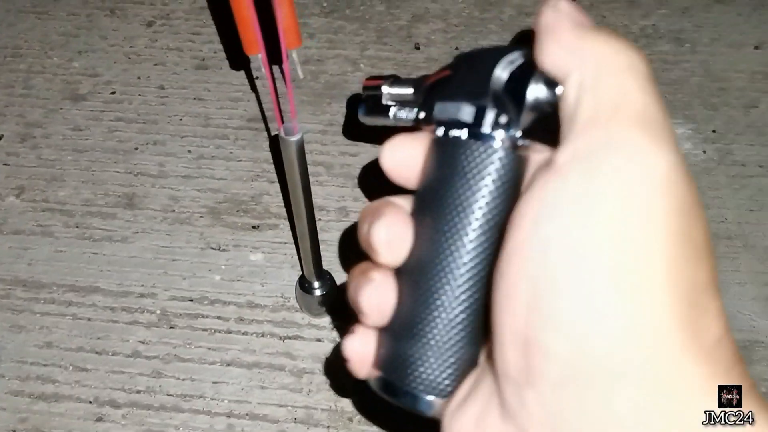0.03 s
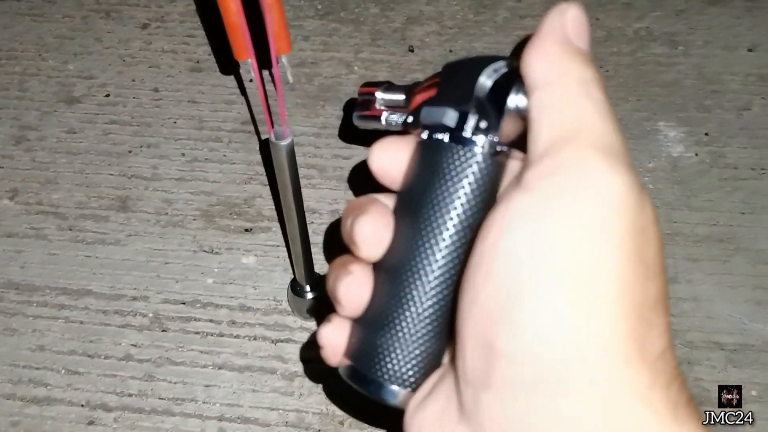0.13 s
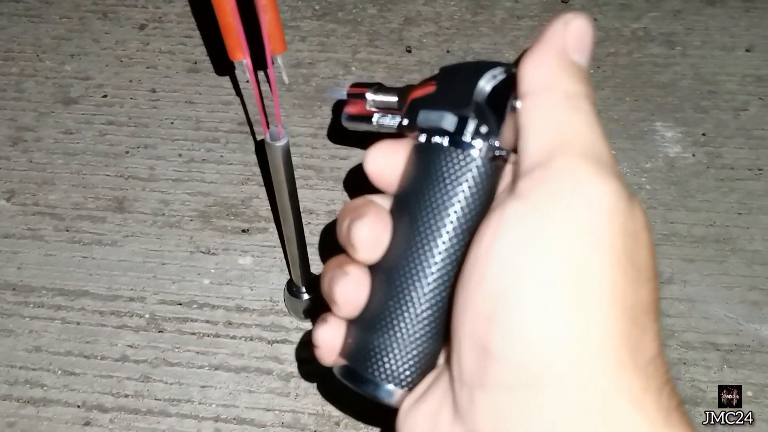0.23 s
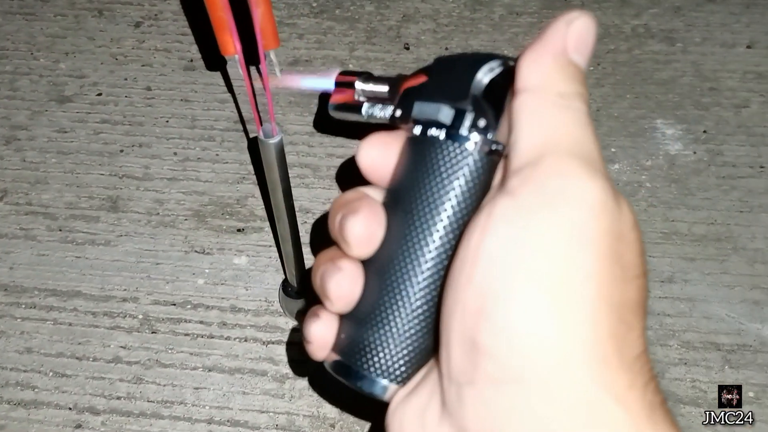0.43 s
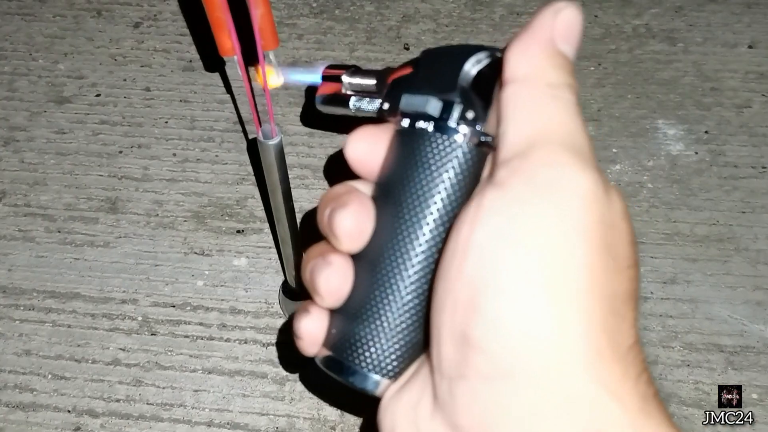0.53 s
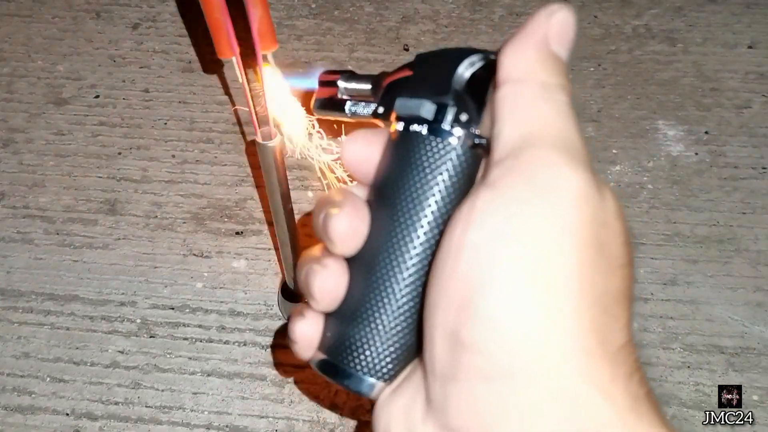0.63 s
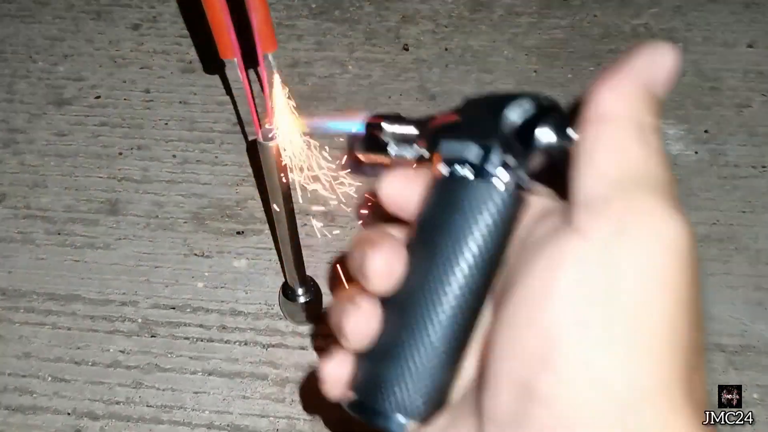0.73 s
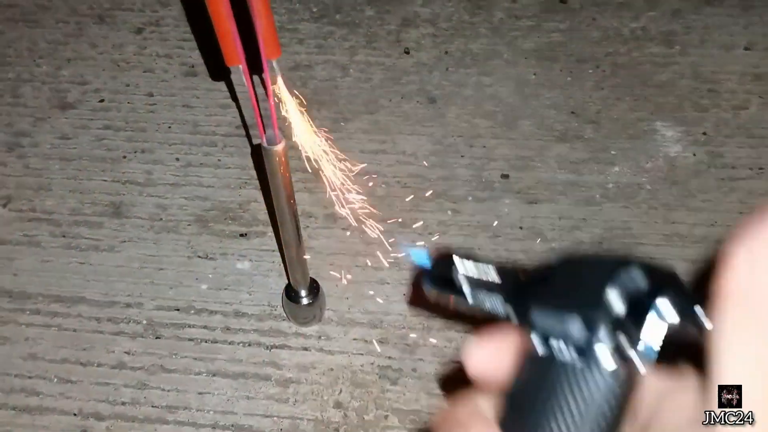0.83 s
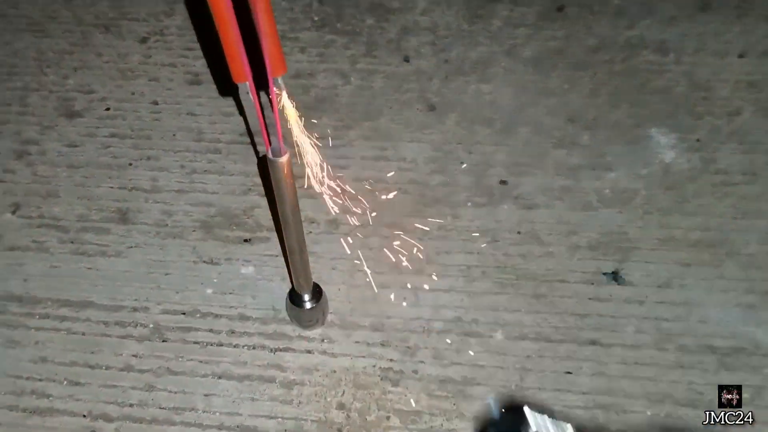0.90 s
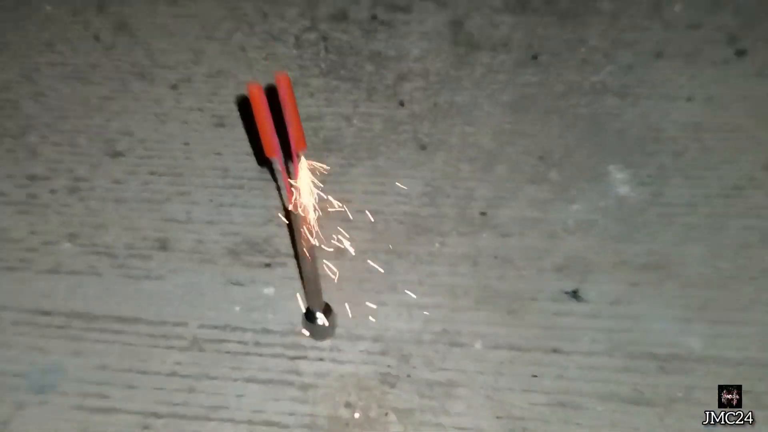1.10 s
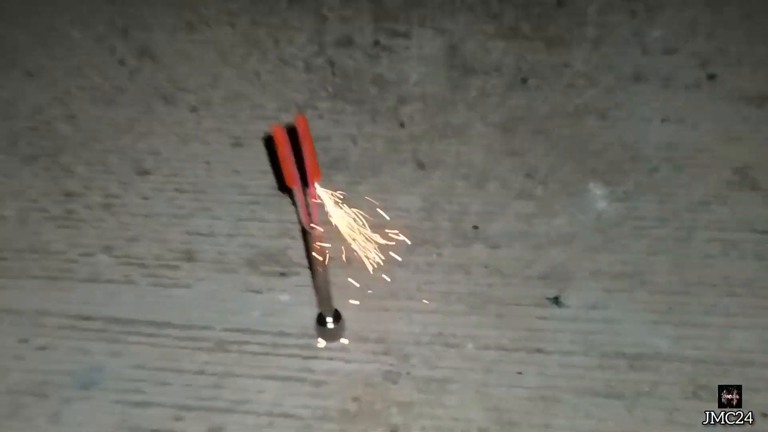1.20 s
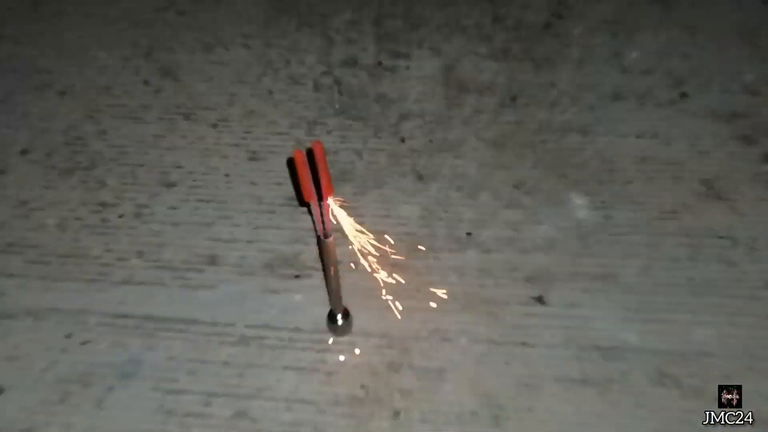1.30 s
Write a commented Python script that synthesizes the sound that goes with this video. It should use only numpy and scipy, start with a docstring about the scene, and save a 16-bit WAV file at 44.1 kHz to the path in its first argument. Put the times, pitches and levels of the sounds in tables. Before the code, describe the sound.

Close up, a torch lighter clicks alight after a brief gas hiss. Its rushing flame fades as the fuses of small rockets on concrete spit and fizz unevenly, over a low rumble of air and handling.

```python
"""Gas hisses from a torch lighter over a low rumble, close to a hand-held pair of microphones.
The piezo striker snaps, the nozzle rings and the jet flame catches. It lights the fuses of small
rockets on a concrete floor: the powder spits twice and fizzes in surges as the lighter is drawn away.
The left microphone hears mostly the upper middle, the right one the top; the floor throws the fizz back."""
import sys
import numpy as np
from scipy import signal
from scipy.fft import rfft, irfft
from scipy.io import wavfile
from scipy.ndimage import map_coordinates

SR = 44100
rng = np.random.default_rng(int(sys.argv[2]) if len(sys.argv) > 2 else 0)


def pcm_store(signal):
    """Save signal as 16-bit PCM."""
    levels = np.round(np.clip(np.atleast_2d(signal), -1, 1) * 32767)
    wavfile.write(sys.argv[1], SR, levels.astype(np.int16).T)


N = 59535
TIME, BIN_HZ = np.arange(N) / SR, np.fft.rfftfreq(N, 1 / SR)
SNAP_S, CATCH_S, WITHDRAW_S = 0.2032, 0.0098, 0.77  # the strike, time taken to catch, lighter drawn away


def amp(db):
    """Decibels to gain."""
    return 10 ** (np.asarray(db) / 20)


def unit(x):
    """Scales to rms 1."""
    return x / np.sqrt(np.mean(x ** 2) + 1e-20)


def read(table, hz, column=1):
    """One column of a table, interpolated on a log-frequency axis."""
    table = np.array(table)
    return np.interp(np.log(hz + 1), np.log(table[:, 0] + 1), table[:, column])


def add(mix, start_s, sound):
    """Mixes a sound in at the given time."""
    part = mix[..., round(start_s * SR):][..., :sound.shape[-1]]
    part += sound[..., :part.shape[-1]]


def delay(x, seconds):
    """Delays by any time, even a fraction of a sample."""
    return irfft(rfft(x) * np.exp(-2j * np.pi * BIN_HZ * seconds), N)


def lowpass(x, hz, order=2):
    """Causal low-pass."""
    return signal.sosfilt(signal.butter(order, hz, fs=SR, output="sos"), x)


def colour(pair, table, size=4096):
    """Gives each microphone's signal its own minimum-phase colour."""
    hz = abs(np.fft.fftfreq(size, 1 / SR))
    log_gain = np.log(amp([read(table, hz, 1), read(table, hz, 2)]))
    response = np.exp(np.conj(signal.hilbert(log_gain)))
    taps = np.fft.ifft(response).real[:, :size // 2]
    return signal.fftconvolve(pair, taps, axes=1)[:, :N]


# How alike the two microphones hear. Each row: frequency in Hz, likeness from 0 to 1.
MIC_LIKENESS = [(50, 0.89), (600, 0.92), (1300, 0.88), (2500, 0.49), (5000, 0.16), (9000, 0), (15000, 0)]


def at_mics(a, b):
    """Blends two unrelated signals into a pair, alike in the bass and unlike in the treble."""
    same = read(MIC_LIKENESS, BIN_HZ)
    return np.array([a, irfft(same * rfft(a) + np.sqrt(1 - same ** 2) * rfft(b), N)])


def noise():
    """White turbulence at both microphones."""
    return at_mics(*rng.standard_normal((2, N)))


def flutter(depth_db, hz):
    """A random gain that wavers up to the given rate."""
    return amp(depth_db * unit(lowpass(rng.standard_normal(N), hz)))


def scatter(t60, size=3000):
    """A dying burst of noise of energy 1 at each microphone."""
    burst = rng.standard_normal((2, size)) * amp(-60 * TIME[:size] / t60)
    return burst / np.linalg.norm(burst, axis=1, keepdims=True)


# Air and handling, right at the microphones. Each row: frequency in Hz, left and right gain in dB.
RUMBLE_COLOUR = [(20.2, -62, -54), (44.6, -50.5, -34), (91, -36, -28.5), (129.3, -35.5, -29),
                 (245, -52, -44.5), (412, -42.5, -43)]
# Its rise and fall. Each row: time in seconds, gain in dB.
RUMBLE_SWELL = [(0, -3), (.13, -1), (.27, -0.5), (.45, -2), (.6, -2), (.75, 0), (.97, 0), (1.1, -4),
                (1.35, 1.5)]


def rumble():
    """Lumpy low noise of moving air and handling, over faint room hiss and a thin whine."""
    swell = amp(np.interp(TIME, *np.transpose(RUMBLE_SWELL)))
    low = lowpass(colour(noise(), RUMBLE_COLOUR), hz=308, order=3)
    hiss = amp(-72) * noise()
    whine = amp(-82.5) * np.sin(2 * np.pi * 2260 * TIME)
    return low * swell + hiss + whine


# The unlit jet, close up. Each row: frequency in Hz, left and right gain in dB.
GAS_COLOUR = [(696, -84, -64), (1530, -68, -69), (3340, -53, -74), (4000, -49, -69), (4190, -37, -61),
              (5450, -33, -45), (6040, -49.5, -51), (6880, -37.5, -35.5), (8100, -49.5, -50),
              (8460, -65, -63), (9280, -63, -60), (10210, -49, -35), (12500, -61, -57), (14100, -63, -46),
              (15200, -49, -56)]


def gas(open_s=0.015, rise_s=0.03, swell_db_per_s=40):
    """The valve opens and the cold jet swells until it is lit."""
    opening = np.clip((TIME - open_s) / rise_s, 0, 1) ** 2
    unlit = np.clip(1 - (TIME - SNAP_S) / CATCH_S, 0, 1)
    swell = amp(1.3 + swell_db_per_s * np.minimum(TIME - SNAP_S, 0))
    return colour(noise() * opening * unlit * swell * flutter(depth_db=1.06, hz=63), GAS_COLOUR)


# Knocks on the left microphone only. Each row: start in seconds, relative level in dB, pitch in Hz.
LEFT_KNOCKS = [(0.1204, -28.5, 900), (0.2041, -29, 310), (0.7895, -23, 750)]


def knocks(t60=0.0019):
    """The trigger, the lighter's body and the hand give dull, quickly damped knocks."""
    out = np.zeros((2, N))
    for start_s, db, hz in LEFT_KNOCKS:
        decay = amp(db - 60 * TIME / t60)
        add(out[0], start_s, 2 * decay * np.sin(2 * np.pi * hz * TIME))
    return lowpass(out, hz=3060, order=4)


# Close thumps, most of them heavier on the right microphone.
# Each row: start and length in seconds, pitch in Hz, left and right level in dB.
LOW_THUMPS = [(0.2029, 0.0123, 147, -44, -31.5), (0.2062, .024, 44.3, -56, -36.5),
              (0.7112, 0.0077, 94, -54, -41.5), (0.7898, .007, 170, -39.5, -54),
              (1.238, 0.025, 77.6, -53.5, -45.5)]


def thumps():
    """Low pushes: the striker jolts the lighter, the gas catches, the hand moves."""
    out = np.zeros((2, N))
    for start_s, length_s, hz, left_db, right_db in LOW_THUMPS:
        t = np.arange(0, length_s, 1 / SR)
        push = np.sin(np.pi * t / length_s) ** 0.5 * np.sin(2 * np.pi * hz * t)
        add(out, start_s, amp([[left_db], [right_db]]) * push)
    return out


# The striker at close range. Each row: frequency in Hz, left and right gain in dB.
SNAP_COLOUR = [(720, -41, -27), (1320, 3.5, 4), (2230, 5.5, -3.5), (2600, 17, 8), (3430, 15, -2),
               (3750, 1, -4), (4170, 21, -13), (4740, 13.5, -5), (5040, 24, 16), (5600, 11.5, 7),
               (6150, 26.5, -11), (6870, 12.5, 23), (7300, 4, 12.5), (8100, -8, 23), (9300, -18, 9),
               (10120, 9.5, 16.5), (11500, 0.5, 2), (14500, -8.5, 7.5)]
# Modes of the lighter's body and metal nozzle.
# Each row: pitch in Hz, left and right level in dB, seconds to fall by 60 dB.
LIGHTER_MODES = [(3580, -37.5, -55, 0.087), (5110, -2, -19, 0.0039), (5534, -24, -42, 0.046),
                 (6570, -25, -29, 0.018), (8280, -40, -27, .04)]


def snap(rebound_s=0.000948, ring_rise_s=0.00052, left_lag_s=0.000323):
    """The piezo hammer strikes, rebounds and rattles; the body and nozzle ring on."""
    blow = np.zeros((2, N))
    add(blow, SNAP_S, np.ones(1))
    rattle = amp(-5.5) * scatter(t60=0.0094)
    add(blow, SNAP_S + rebound_s, rattle)
    blow[0] += 0.27 * delay(blow[0], rebound_s)  # the rebound, on the left only
    out = amp(-4.5) * colour(blow, SNAP_COLOUR)
    rise = np.minimum(TIME / ring_rise_s, 1)
    for hz, left_db, right_db, t60 in LIGHTER_MODES:
        decay = amp(-60 * np.maximum(TIME - ring_rise_s, 0) / t60)
        ring = rise * decay * np.cos(2 * np.pi * hz * TIME)
        add(out, SNAP_S, amp([[left_db], [right_db]]) * ring)
    return np.array([delay(out[0], left_lag_s), out[1]])


# The lit jet while still close. Each row: frequency in Hz, left and right gain in dB.
FLAME_COLOUR = [(330, -47, -46.5), (647, -59, -60.5), (763, -45.5, -49), (1146, -36.5, -42),
                (1466, -36.5, -43.5), (1800, -52.5, -58), (2490, -38, -46.5), (3150, -56.5, -73),
                (3580, -41, -55.5), (4930, -44.5, -62), (5336, -32.5, -51), (6000, -54, -56),
                (8460, -57.5, -49), (9300, -65, -52.5), (10970, -55, -43.5), (12900, -77, -60),
                (14600, -61, -49.5)]


def flame(flare_db=3, flare_s=0.012, fade_db_per_s=79):
    """The jet flame flares with a bright whoosh, roars steadily and fades as it is drawn away."""
    lit_s = np.maximum(TIME - SNAP_S, 0)
    catch = np.minimum(lit_s / CATCH_S, 1)
    fade_db = fade_db_per_s * np.maximum(TIME - WITHDRAW_S, 0)
    level_db = 0.57 + flare_db * np.exp(-lit_s / flare_s) - fade_db
    out = colour(noise() * catch * amp(level_db), FLAME_COLOUR)
    whoosh = amp([[-18], [-10]]) * scatter(t60=0.12)
    add(out, SNAP_S, whoosh)
    return out


def sparks(per_second=3000, spread_db=3):
    """Tiny bursts of powder: sparse clicks of random size and sign, at rms 1."""
    size = amp(spread_db * np.minimum(rng.exponential(1, (2, N)), 5))
    sign = rng.choice([-1, 1], (2, N))
    fires = rng.random((2, N)) < per_second / SR
    return unit(at_mics(*(size * sign * fires)))


def off_floor(pair, reflection=0.42, drift_s_per_s=0.00016):
    """Adds the echo off the concrete, whose path lengthens as the microphones back away."""
    lag_s = 0.000787 + drift_s_per_s * (TIME - WITHDRAW_S)
    echo = np.array([map_coordinates(x, [(TIME - lag_s) * SR], order=3) for x in pair])
    return pair + reflection * echo


# The fuses, nearby on the floor. Each row: frequency in Hz, left and right gain in dB.
FUSE_COLOUR = [(376, -55, -50.5), (620, -63.5, -60.5), (1083, -44.5, -49.5), (2180, -42, -48),
               (3920, -36.5, -48.5), (4850, -40, -49), (6650, -46.5, -51), (7830, -57.5, -42),
               (8850, -66, -51), (10160, -54, -42.5), (12100, -60, -48.5), (15000, -70, -54)]
# How hard they burn. Each row: time in seconds, gain in dB.
FUSE_SURGES = [(0.537, -11), (.6, -1.5), (.68, -1.5), (.77, 4.5), (.835, 4.5), (.91, -0.5), (.941, 2),
               (1.015, -2), (1.036, 4.5), (1.077, 0), (1.093, -5), (1.14, -3), (1.165, -2.5), (1.19, 0.5),
               (1.224, 1), (1.241, -5.5), (1.35, -8.5)]
# The top sizzles where fresh powder catches. Each row: centre and width in seconds, treble lift in dB.
FUSE_SIZZLES = [(.768, 0.025, 4), (.945, 0.018, 3)]


def fuse(spark_share=0.25, left_lag_s=0.00007, top_hz=8500, top_follows=0.85):
    """Rushing powder gas and sparks fizz and echo off the floor; the top surges less than the body."""
    fizz = np.sqrt(1 - spark_share) * noise() + np.sqrt(spark_share) * sparks()
    fizz[0] = delay(fizz[0], left_lag_s)
    fizz = off_floor(fizz) * flutter(depth_db=1.2, hz=88)
    body = irfft(rfft(fizz) / (1 + (BIN_HZ / top_hz) ** 6), N)
    top = fizz - body
    burn_db = np.interp(TIME, *np.transpose(FUSE_SURGES), left=-90)
    sizzle_db = sum(db * np.exp(-0.5 * ((TIME - s) / width) ** 2) for s, width, db in FUSE_SIZZLES)
    surging = body * amp(burn_db) + top * amp(top_follows * burn_db + sizzle_db)
    return amp(-1.38) * colour(surging, FUSE_COLOUR)


# Spits from the fuses. Each row: time in seconds, crack and sputter gain in dB, sputter width in seconds.
FUSE_SPITS = [(.7339, -1.5, -11, .0005), (0.7663, -2.5, -7, .001)]
# The spits at the microphones. Each row: frequency in Hz, left and right gain in dB.
SPIT_COLOUR = [(780, -30, -43), (2060, -6, -20), (3340, -7, -13), (4270, 7.5, -14), (5350, 0, -9.5),
               (6400, -6.5, -8), (8700, -21, -12), (10700, -25, -7.5), (14500, -27, -10)]


def spits():
    """A grain of powder bursts: one crack inside a short sputter, then a dying spray."""
    out = np.zeros((2, N))
    for at_s, crack_db, sputter_db, width_s in FUSE_SPITS:
        sputter = noise() * np.exp(-0.5 * ((TIME - at_s) / width_s) ** 2)
        out += amp(sputter_db) * sputter / np.linalg.norm(sputter, axis=1, keepdims=True)
        add(out, at_s, amp([crack_db]))
        spray = amp(crack_db - 2) * scatter(t60=0.018)
        add(out, at_s, spray)
    return colour(off_floor(out), SPIT_COLOUR)


def scene():
    """Lighter, fuses and background at the two microphones."""
    return gas() + snap() + thumps() + flame() + fuse() + spits() + knocks() + rumble()


# The top end of both microphones. Each row: frequency in Hz, gain in dB.
MIC_ROLL_OFF = [(15000, -0.5), (15400, -12), (16000, -33)]


def record(dry, edge_hz=16900):
    """Microphone roll-off, then the band limit."""
    dull = irfft(rfft(dry) * amp(read(MIC_ROLL_OFF, BIN_HZ)), N)
    taps = signal.firwin(255, edge_hz, window=("kaiser", 9), fs=SR)
    return signal.oaconvolve(dull, taps[None], "same")


dry = scene()
out = record(dry)
pcm_store(out)
```